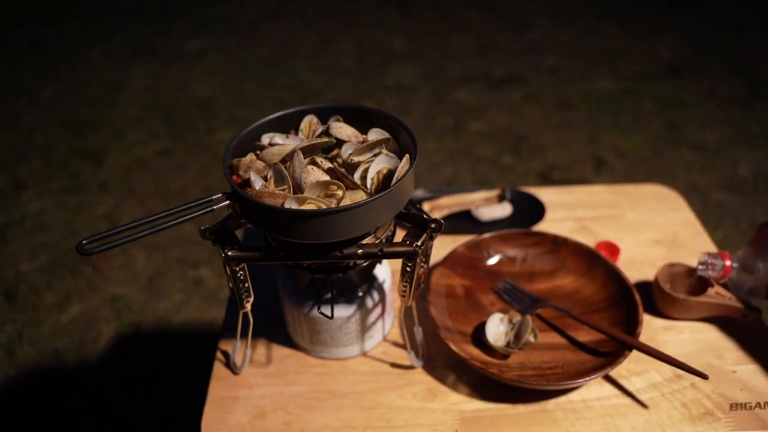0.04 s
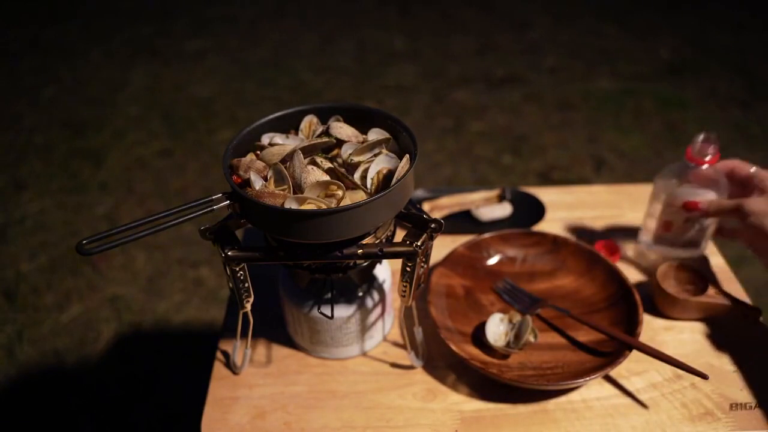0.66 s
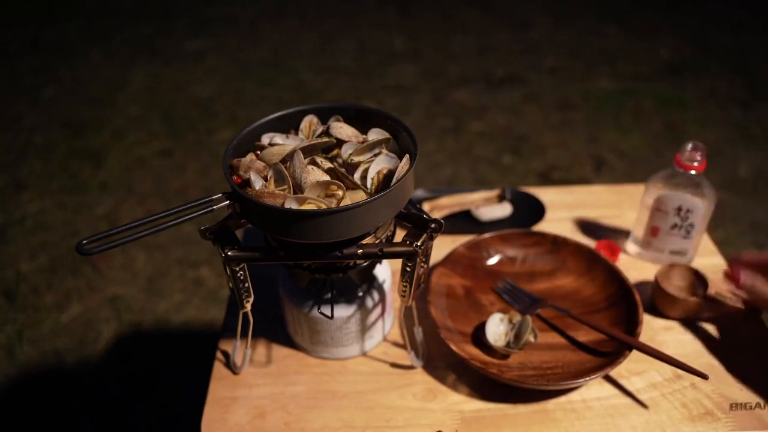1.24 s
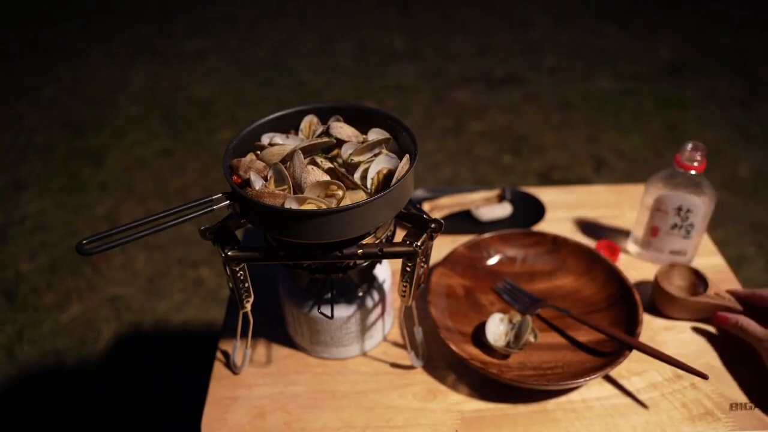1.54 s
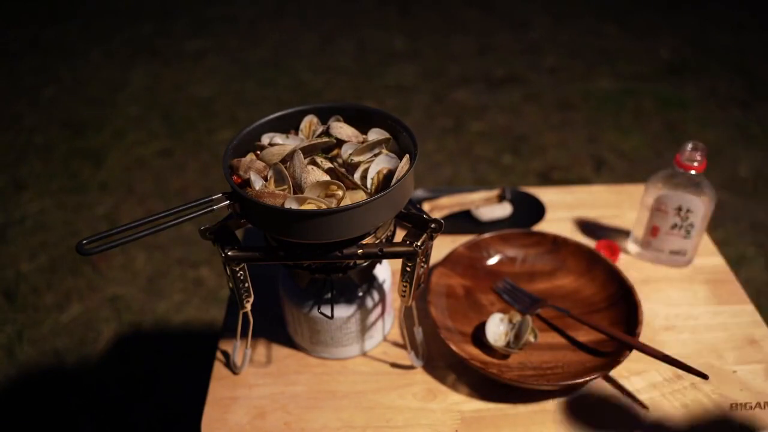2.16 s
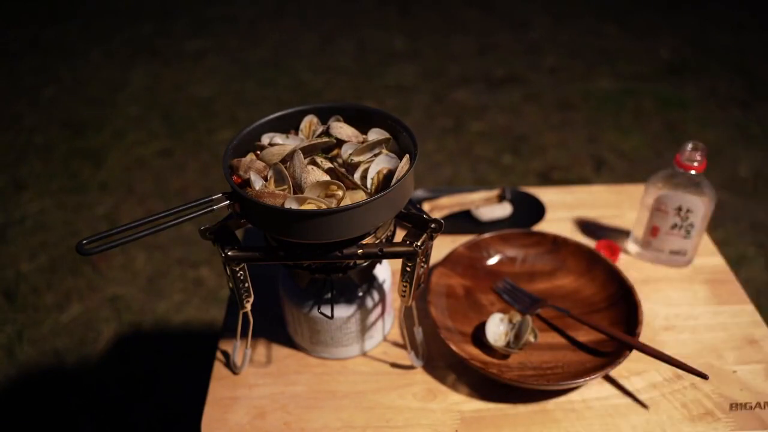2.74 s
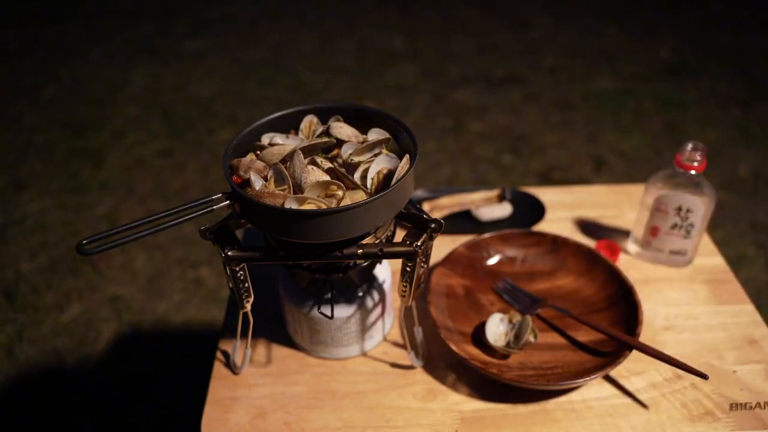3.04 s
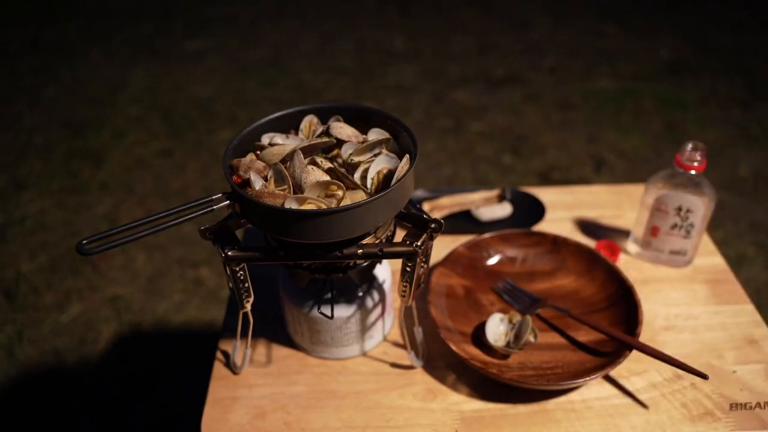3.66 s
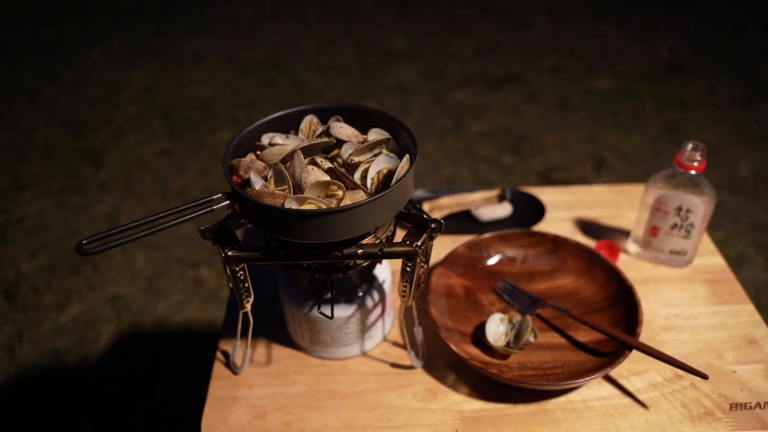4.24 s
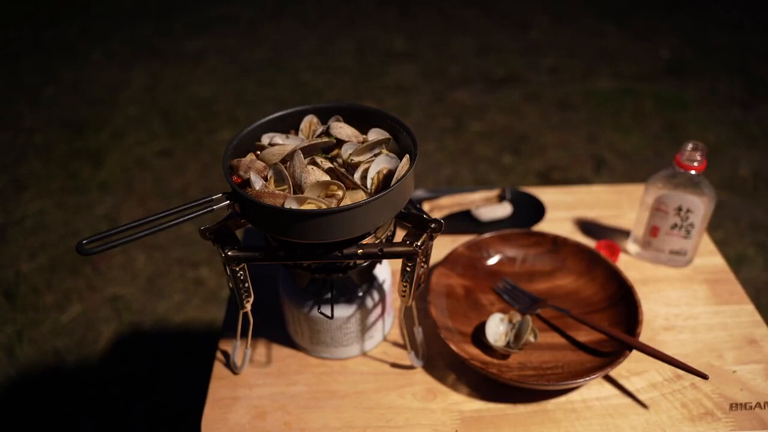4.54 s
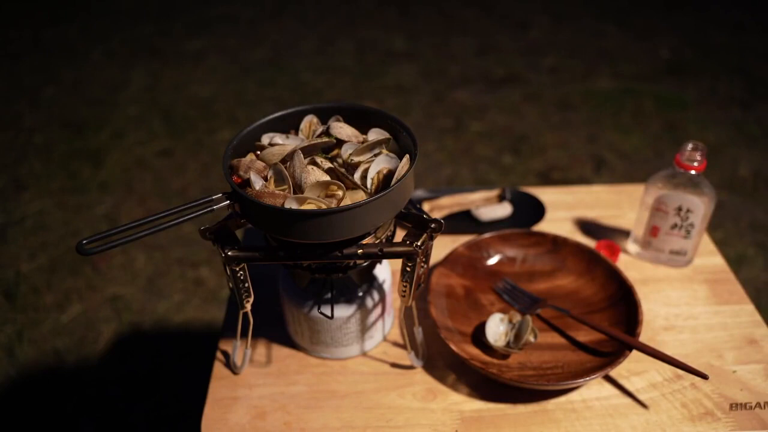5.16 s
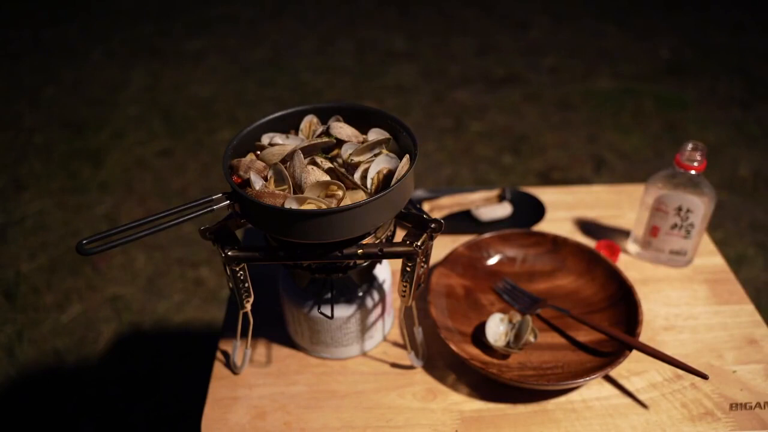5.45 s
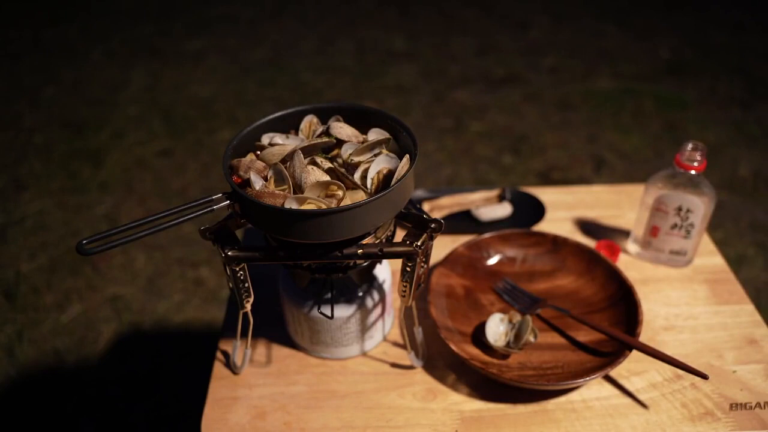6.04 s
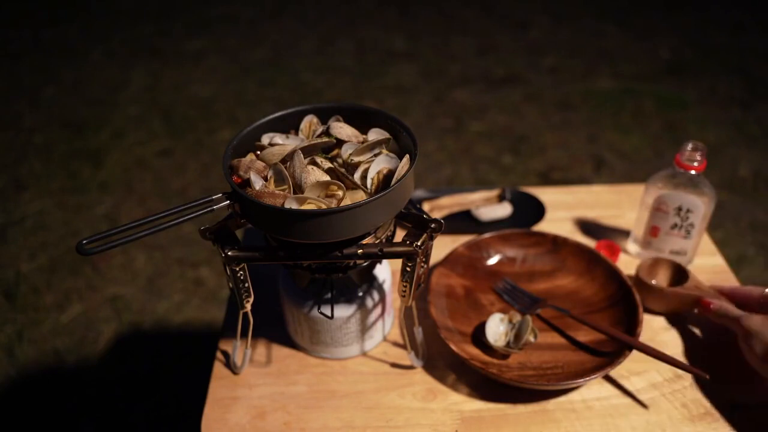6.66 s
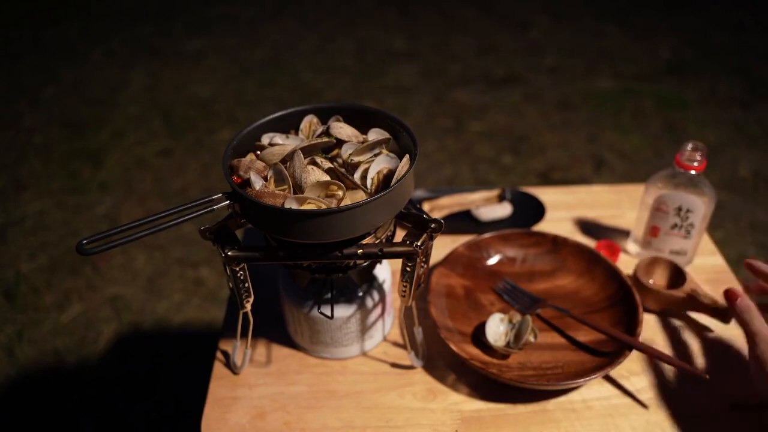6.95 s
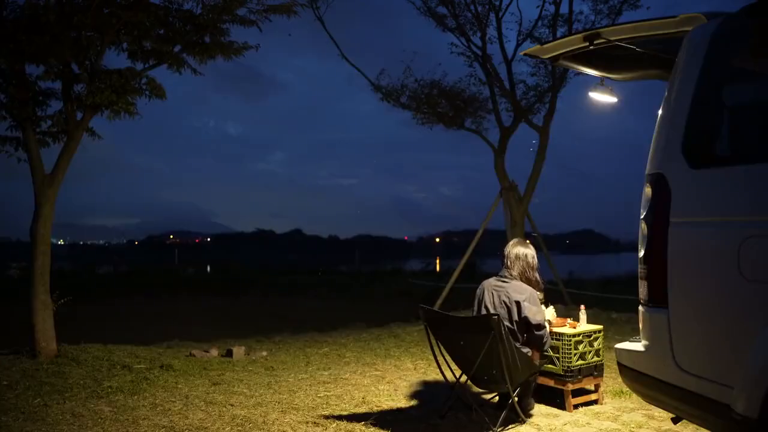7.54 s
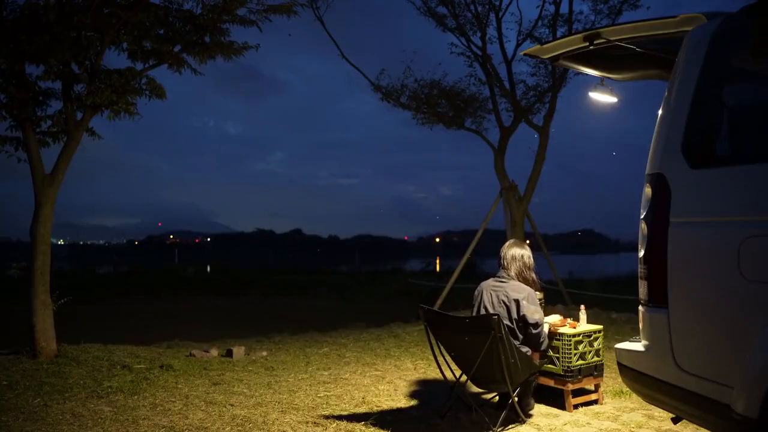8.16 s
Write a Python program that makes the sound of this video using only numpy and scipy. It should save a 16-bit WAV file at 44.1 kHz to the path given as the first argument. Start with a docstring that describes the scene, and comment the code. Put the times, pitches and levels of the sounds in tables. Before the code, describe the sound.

Crickets and katydids chirp, trill and rasp throughout at a riverside campsite at night, over a low distant rumble. Early on, a bottle lands on a small wooden table and rocks briefly. Light tableware ticks and faint sleeve scuffs follow. Near the end a wooden cup knocks twice on the table, then the single microphone jumps farther away and the nearest insects drop back.

```python
"""Riverside campsite at night: crickets and katydids sing over a low, distant rumble.
Each wing stroke draws a scraper over a file; far insects blur into pulsing bands of noise.
A bottle and a wooden cup, set down, ring the modes of a small wooden table and of the cup;
tableware ticks, hand and sleeve scuff. Near the end the one microphone's position jumps
to a second spot, away from the table and the nearest insects."""
import sys
import numpy as np
from scipy import signal
from scipy.fft import rfft, irfft, next_fast_len
from scipy.io import wavfile
from scipy.ndimage import uniform_filter1d, map_coordinates

SR = 44100
rng = np.random.default_rng(int(sys.argv[2]) if len(sys.argv) > 2 else 0)


def store_pcm(level_fs):
    """Save levels as 16-bit WAV."""
    pcm = np.round(np.clip(level_fs, -1, 1) * 32767).astype(np.int16)
    wavfile.write(sys.argv[1], SR, np.atleast_2d(pcm).T)


N = 369999


def amp(db):
    """Decibels to gain."""
    return 10 ** (np.asarray(db) / 20)


def unit(x):
    """Scale to rms 1."""
    return x / np.sqrt(np.mean(x ** 2) + 1e-20)


def clock():
    """Sample times [s]."""
    return np.arange(N) / SR


def curve(rows):
    """Interpolate (time [s], value) rows per sample."""
    return np.interp(clock(), *np.transpose(rows))


def wobble(rate_hz):
    """Smooth random curve, rate_hz knots a second."""
    return map_coordinates(rng.standard_normal(int(N * rate_hz / SR) + 4), [clock() * rate_hz])


def filtered(x, response):
    """Apply a gain that depends on frequency."""
    m = next_fast_len(N + SR // 2)
    return irfft(rfft(x, m) * response(np.fft.rfftfreq(m, 1 / SR)), m)[:N]


def noise(spectrum):
    """Noise of rms 1, coloured by (frequency [Hz], level [dB]) rows."""
    knots_hz, db = np.transpose(spectrum)
    white = rng.standard_normal(N)
    return unit(filtered(white, lambda hz: amp(np.interp(np.log(hz + 1), np.log(knots_hz), db, -120))))


def band(centre_hz, width_hz):
    """Noise of rms 1 in one resonance."""
    white = rng.standard_normal(N)
    return unit(filtered(white, lambda hz: (1 + ((hz - centre_hz) / width_hz) ** 2 / 2) ** -4))


def patchy(x, depth_db):
    """Narrow regions of a noise swell and fade independently."""
    spectra = signal.stft(x, nperseg=1024)[2]
    field = uniform_filter1d(rng.standard_normal(spectra.shape), size=4, axis=0)
    field = uniform_filter1d(field, size=6, axis=1)
    return unit(signal.istft(spectra * amp(depth_db * unit(field)), nperseg=1024)[1][:N])


def add(track, start_s, sound):
    """Mix a sound into the track."""
    start = round(start_s * SR)
    track[start:start + len(sound)] += sound[:max(N - start, 0)]


def ring(modes, t):
    """Decaying modes, their strengths varying per strike."""
    return sum(amp(db + rng.normal(0, 1) - 60 * t / t60_s) * np.sin(2 * np.pi * hz * t)
               for hz, db, t60_s in modes)


def scatter(x, t60_s, wet_db):
    """Grass and trees add a short diffuse tail."""
    t = np.arange(SR // 3) / SR
    tail = rng.standard_normal(len(t)) * amp(-60 * t / t60_s)
    return x + amp(wet_db) * signal.fftconvolve(x, tail / np.linalg.norm(tail))[:N]


def moved(jump_s=7.305):
    """0 beside the table, 1 at the second spot."""
    return np.clip((clock() - jump_s) * 200, 0, 1)


def phrases(rows, hz):
    """Calls on one pitch: (start [s], end [s], pitch [Hz], level [dB])."""
    return [(stop_s - length_s, stop_s, hz, db) for stop_s, length_s, db in rows]


def beat(first_s, period_s, slowing_per_s, length_s, hz, db):
    """Calls on a beat whose tempo may drift."""
    even_s = np.arange(first_s, N / SR, period_s)
    return [(s, s + length_s, hz, db) for s in even_s * (1 + slowing_per_s * even_s)]


def song(calls, rate_hz, slowing, duty, fall, swell, release, rough, rough_hz):
    """Each wing stroke draws a scraper over a file: one short tone that sags in pitch."""
    out = np.zeros(N)
    strength, stray = amp(.37 * wobble(35)), .0036 * wobble(45)
    grit, flutter = wobble(rough_hz), wobble(rough_hz)
    for (start_s, end_s, hz, db), (detune, hurry) in zip(calls, rng.standard_normal((len(calls), 2))):
        i = np.arange(max(round(start_s * SR), 0), min(round(end_s * SR), N))
        t = i / SR - start_s
        progress = t / (end_s - start_s)
        cycles = rate_hz * t * (1 + .0246 * hurry + slowing * (1 - progress) / 2)
        stroke = np.minimum(cycles % 1 / duty, 1)  # 0-1 while the wings close
        effort = np.sin(np.pi / 2 * np.clip(np.minimum(progress / swell, (1 - progress) / release), 0, 1))
        bend = .0121 * (effort - 1)  # harder strokes sound higher
        pitch_hz = hz * (1 + .002545 * detune + bend + fall * (.5 - stroke) + stray[i])
        phase = 2 * np.pi * np.cumsum(pitch_hz) / SR
        uneven_teeth = grit[i] * np.sin(phase) + flutter[i] * np.cos(phase)
        tone = np.sin(phase) + rough * uneven_teeth
        out[i] += amp(db) * effort * strength[i] * np.sin(np.pi * stroke) * tone
    return out


def near_trill():
    """A near cricket swells and breaks off about every 0.63 s."""
    # phrases (stop [s], length [s], relative level [dB])
    trills = [(.04, 0.28, -47), (.58, 0.25, -45.5), (1.235, 0.34, -47), (1.856, 0.25, -45),
              (2.475, 0.26, -44.5), (3.155, .27, -49), (3.77, 0.29, -46.5), (4.375, 0.28, -49),
              (5.035, .275, -49.5), (5.66, 0.23, -47.5), (6.272, .225, -48.5), (6.95, .29, -47.5)]
    return amp(1.5) * song(phrases(trills, hz=2936), rate_hz=55, slowing=0, duty=.8, fall=.035,
                           swell=.56, release=.03, rough=.24, rough_hz=220)


def field_crickets():
    """Two crickets chirp, each to its own beat; both are faint at the second spot."""
    # singers (first chirp [s], period [s], slowing [1/s], length [s], pitch [Hz], relative level [dB])
    singers = [(-.025, .238, -.00214, .11, 5308, -49.8), (-.157, .337, .0038, .148, 5280, -51)]
    # how well the pair carries (time [s], gain [dB])
    carry = [(0, 2.5), (.7, -1), (1.5, 2.5), (3.3, 3.5), (4.4, -.5), (5.5, 1.5), (6.4, 1.5), (7.25, 4.5)]
    chirps = sum(song(beat(*singer), rate_hz=36.5, slowing=.02, duty=.7, fall=.012,
                      swell=.15, release=.06, rough=.14, rough_hz=200) for singer in singers)
    return amp(curve(carry) - 17 * moved()) * chirps


def far_trill():
    """A farther, lower cricket sings longer phrases."""
    # phrases (stop [s], length [s], relative level [dB])
    trills = [(.44, 0.53, -62), (1.08, 0.32, -55), (1.77, 0.27, -54.5), (2.43, 0.25, -52), (3.3, .55, -61),
              (4.35, 0.53, -59.5), (5.0, 0.64, -60.5), (5.6, 0.6, -59.5), (6.2, .48, -57),
              (6.85, 0.52, -59.5), (7.45, .53, -62), (8.02, .47, -67), (8.45, 0.4, -61)]
    return amp(-1) * song(phrases(trills, hz=2869), rate_hz=50, slowing=.049, duty=.7, fall=.05,
                          swell=.297, release=.055, rough=.61, rough_hz=246.3)


def bush_crickets():
    """Fast, rough strokes buzz: a near singer and a lower neighbour on an even beat."""
    # near singer (stop [s], length [s], relative level [dB])
    buzzes = [(.22, .52, -48), (1.52, 0.42, -50.5), (2.78, 0.45, -51), (4.06, 0.46, -48.5),
              (5.38, 0.46, -50), (6.92, .44, -50.5), (7.62, 0.44, -55), (8.08, 0.46, -60)]
    # neighbour (first buzz [s], period [s], slowing [1/s], length [s], pitch [Hz], relative level [dB])
    neighbour = (-.37, 1.22, 0, .55, 6200, -54.5)
    near, far = (song(calls, rate_hz=160, slowing=.142, duty=.8, fall=.035,
                      swell=.449, release=.21, rough=.84, rough_hz=448)
                 for calls in (phrases(buzzes, hz=6450), beat(*neighbour)))
    return amp(-5) * (near + amp(-2 * moved()) * far)


def near_katydids(burst_s=.24, attack_s=.035, release_s=.038, bed_db=-47):
    """Wings rasp high in the treble, in bursts over a steady bed; gone at the second spot."""
    # bursts (start [s], level [dB])
    bursts = [(-.06, -46.5), (.68, -46), (1.19, -50.5), (1.43, -47), (1.75, -46.5), (2.15, -44),
              (2.43, -48), (3.02, -48), (3.4, -47), (3.8, -51), (4.32, -46), (4.66, -46.5), (4.99, -46),
              (5.39, -46.5), (6.06, -48), (6.34, -46.5), (6.79, -48), (7.08, -47)]
    # rasp spectrum (frequency [Hz], density [dB])
    colour = [(5590, -62), (9500, -34), (10000, -16), (12100, -2.5), (12900, 0.5), (14600, -1), (15500, -7)]
    stroke = np.cumsum(39.5 * (1 + .055 * wobble(8))) / SR % 1
    swing = unit(np.sin(np.pi * stroke ** 1.7))  # builds up, breaks off
    pulsing = unit(2.1 + swing * amp(1.4 * wobble(30)))
    teeth = unit(amp(.61 * wobble(600)))
    wing_modes = sum(band(hz, width_hz=260) for hz in (12400, 13300, 14080))
    grain = patchy(noise(colour) + .2 * unit(wing_modes), depth_db=2.5)
    t, power = clock(), amp(bed_db) ** 2
    for s, db in bursts:
        gate = np.clip(np.minimum((t - s) / attack_s, (s + burst_s - t) / release_s), 0, 1)
        power = power + amp(db) ** 2 * gate
    return np.sqrt(power) * (1 - moved()) * pulsing * teeth * grain


def far_katydids():
    """Distant rasps merge into a high hiss."""
    # hiss spectrum (frequency [Hz], density [dB])
    colour = [(5290, -28), (9000, -20), (9790, -7), (10200, -11.5), (10900, -2), (11700, 1), (13600, 0.5),
              (15500, -8.5)]
    return amp(-58 + .5 * wobble(5.5)) * patchy(noise(colour), depth_db=4)


def chorus():
    """Many far insects blur into pulsing bands, one per species."""
    # bands (pitch [Hz], width [Hz], level [dB], stroke rate [Hz], loss at second spot [dB])
    species = [(2857, 250, -65.5, 64, 0), (3954, 490, -64, 52, 2), (4290, 240, -54, 45, 6.5),
               (4725, 560, -55, 60, 5.5), (5050, 300, -58.5, 29, 5), (5275, 75, -65, 37, -.5),
               (6400, 740, -62.5, 130, 0.5), (8096, 760, -60.5, 36, 4), (8630, 1400, -63.5, 65, 18)]
    out = np.zeros(N)
    for hz, width_hz, db, rate_hz, loss_db in species:
        cycles = np.cumsum(rate_hz * (1 + .12 * wobble(5))) / SR + rng.random()
        strokes = unit(np.abs(np.sin(np.pi * cycles)) ** .79)
        gain = amp(db - loss_db * moved() + 1.1 * wobble(5))
        out += gain * unit(2.9 + strokes) * patchy(band(hz, width_hz), depth_db=2)
    return out


def rumble():
    """A low distant rumble with a soft haze above it; each spot has its own colour."""
    # spectra at the table and at the second spot (frequency [Hz], density [dB])
    bass_first = [(13, -59), (22, -34), (27, -44), (47, -11), (76, 0.5), (124, 0), (155, -2), (210, -9),
                  (244, -12.5), (328, -23), (358, -20), (395, -23.5), (420, -18.5), (550, -57), (920, -120)]
    bass_second = [(15, -54), (25, -22), (59, -12), (72, -2), (92, -1.5), (140, -2), (167, -7.5), (212, -7),
                   (300, -20), (420, -26.5), (550, -51), (920, -120)]
    haze_first = [(150, -20), (350, -3.5), (550, 1), (850, -2), (1250, -5.5), (1700, -12), (2400, -14),
                  (3400, -14), (6000, -10.5), (10000, -38), (15500, -24.5)]
    haze_second = [(150, -14), (350, 1.5), (800, -1), (1300, -3), (1800, -12.5), (2400, -20.5), (3400, -21),
                   (6000, -22), (15500, -37)]
    # slow swells (time [s], relative level [dB])
    bass_level = [(0, -43.5), (.45, -45), (.9, -44.5), (1.7, -47), (3.6, -46), (4.5, -46.5), (5.6, -44),
                  (6.3, -46.5), (6.85, -43.5), (7.3, -45.5), (7.5, -49.5), (8.39, -45.5)]
    haze_level = [(0, -61), (1.2, -57.5), (2.0, -61), (2.57, -58), (3.4, -60.5), (4.3, -62), (5.9, -60),
                  (6.9, -56.5), (7.4, -58.5), (8.39, -58)]
    away = moved()
    bass = (1 - away) * noise(bass_first) + away * noise(bass_second)
    haze = patchy((1 - away) * noise(haze_first) + away * noise(haze_second), depth_db=2.5)
    bass_db = curve(bass_level) + 2.07 + .58 * wobble(6.1)
    haze_db = curve(haze_level) + .33 * wobble(3.4)
    return amp(bass_db) * bass + amp(haze_db) * haze


def meadow_crickets(count):
    """Scattered field crickets chirp at random, each on its own pitch."""
    when, length, key, distance = rng.random((count, 4)).T
    start_s = when * N / SR - .1
    end_s = start_s + .12 + .22 * length
    pitch_hz, level_db = 4150 + 1000 * key ** 1.5, -53 - 7 * distance
    chirps = song(np.transpose([start_s, end_s, pitch_hz, level_db]), rate_hz=41, slowing=.13,
                  duty=.62, fall=.0266, swell=.33, release=.18, rough=.13, rough_hz=296)
    return amp(-5 * moved()) * scatter(chirps, t60_s=.1, wet_db=-6)


def tableware():
    """Light ticks of handled tableware: one mode and a crack of noise, dying together."""
    # ticks (time [s], relative level [dB], ring [Hz], t60 [s])
    ticks = [(.49, -38.5, 2000, 0.073), (.497, -45, 4800, .033), (1.068, -40, 4800, .013),
             (1.423, -39, 2200, .027), (1.749, -35, 4560, 0.025), (3.815, -46, 3400, 0.062),
             (3.84, -43.5, 3450, 0.099), (3.885, -46, 3500, 0.048), (7.601, -46, 4500, .051),
             (8.11, -43.5, 3360, .03), (8.151, -39, 3400, 0.079)]
    out, t = np.zeros(N), np.arange(SR // 4) / SR
    crack = noise([(600, 5), (2000, -.5), (4800, 7), (7000, -5), (14000, -24)])
    for s, db, hz, t60_s in ticks:
        grain = crack[rng.integers(N - len(t)):][:len(t)]
        add(out, s, amp(db - 60 * t / t60_s) * (.5 * np.sin(2 * np.pi * hz * t) + .58 * grain))
    return out


def bottle(rise_s=.00074):
    """The bottle lands and rocks, then the table takes two soft bumps."""
    # impacts (time [s], relative level [dB])
    thuds = [(0.9538, -17), (0.9636, -21), (0.9768, -14.5), (0.9968, -28), (1.366, -39), (1.423, -39.5)]
    # table modes (frequency [Hz], relative level [dB], t60 [s])
    modes = [(150, -9.5, .07), (243, -7.5, 0.051), (405, -3.5, 0.07), (478, 1, 0.042), (562, -10, 0.086),
             (720, -28, 0.053), (1250, -16, 0.032), (1710, -26, 0.034), (2010, -27, 0.047)]
    out, t = np.zeros(N), np.arange(SR // 4) / SR
    for s, db in thuds:
        add(out, s, amp(db - 3.5) * ring(modes, t) * (1 - np.exp(-t / rise_s)))
    return out


def scuffs():
    """Hand and sleeve rub in brief swells, catching and slipping."""
    # rubs (peak time [s], length [s], centre [Hz], level [dB])
    rubs = [(1.892, 0.14, 437, -57), (3.853, 0.13, 3220, -54), (6.85, 0.19, 486, -54),
            (7.1, 0.075, 890, -53.5), (7.588, 0.026, 1300, -54)]
    slips = unit(amp(4.7 * wobble(170)))
    return slips * sum(amp(db) * np.exp(-(2 * (clock() - s) / length_s) ** 2) * band(hz, .27 * hz)
                       for s, length_s, hz, db in rubs)


def ticking_katydids():
    """Very short wing strokes make runs of sharp ticks."""
    # runs (start [s], end [s], pitch [Hz], relative level [dB])
    runs = [(2.45, 2.96, 8150, -50), (2.58, 2.69, 11100, -53), (4.038, 4.59, 8950, -47),
            (7.65, 7.75, 10600, -54.5)]
    ticks = song(runs, rate_hz=43.1, slowing=0, duty=.13, fall=.08,
                 swell=.04, release=.02, rough=.5, rough_hz=1000)
    return scatter(amp(2.4) * ticks, t60_s=.095, wet_db=-1.5)


def cup(lead_s=.001, bounce_s=.00235, rise_s=.0023, cutoff_hz=345):
    """The cup knocks on the table, chatters and rings; being small, it radiates little bass."""
    # knocks (time [s], relative level [dB], contact pitch [Hz])
    knocks = [(6.7561, -5, 1080), (6.9126, -10.5, 910)]
    # cup modes (frequency [Hz], relative level [dB], t60 [s])
    modes = [(398, -5, 0.11), (477, 5, 0.035), (535, 9, 0.018), (770, -13.5, 0.13), (958, 12, 0.025),
             (1100, -5, 0.074), (1310, -3, 0.031), (1737, -.5, 0.057), (1844, -2, 0.082), (1950, -2, 0.043),
             (2100, -15, 0.054), (2240, -15, 0.085), (2330, -8, 0.062), (2700, -14, 0.064)]
    out, t = np.zeros(N), np.arange(SR // 4) / SR
    for s, db, hz in knocks:
        phase = 2 * np.pi * hz * (t - lead_s)
        push = phase * np.exp((1 - phase ** 2) / 2)
        for bounce in range(3):
            add(out, s - lead_s + bounce * bounce_s, amp(db - 7.5 * bounce) * push)
        add(out, s, amp(db - 19) * ring(modes, t) * (1 - np.exp(-t / rise_s)))
    return signal.sosfilt(signal.butter(4, cutoff_hz, "highpass", fs=SR, output="sos"), out)


def scene():
    """Everything reaches one microphone, alike in both channels."""
    near = near_trill() + field_crickets()
    far = far_trill() + bush_crickets()
    insects = scatter(near, t60_s=.053, wet_db=-11.5) + scatter(far, t60_s=.084, wet_db=-3.5)
    insects += meadow_crickets(count=90) + near_katydids() + far_katydids() + ticking_katydids()
    background = chorus() + rumble()
    table = scatter(bottle() + cup() + tableware(), t60_s=.12, wet_db=-25)
    return np.tile(insects + background + table + scuffs(), (2, 1))


def record(dry, top_hz=15500):
    """Brick-wall low-pass."""
    return np.array([filtered(channel, lambda hz: hz < top_hz) for channel in dry])


dry = scene()
out = record(dry)
store_pcm(out)
```